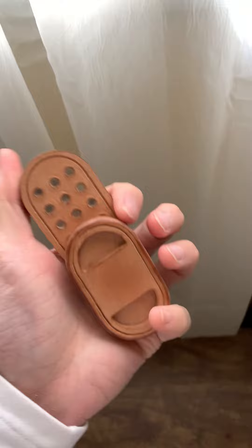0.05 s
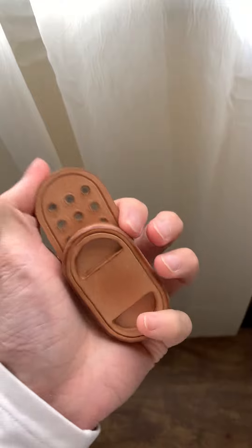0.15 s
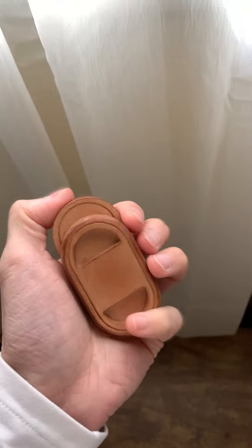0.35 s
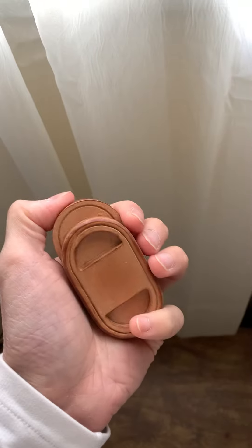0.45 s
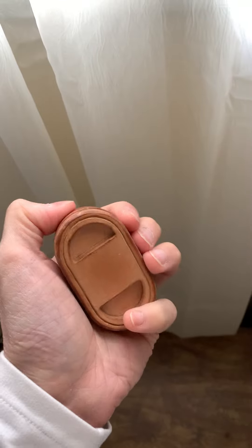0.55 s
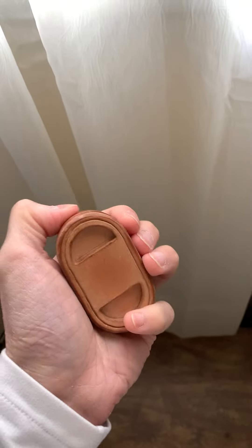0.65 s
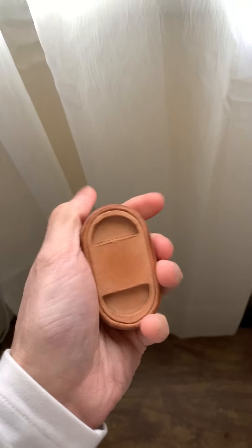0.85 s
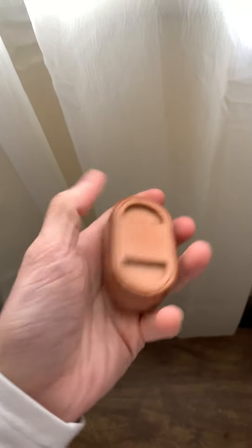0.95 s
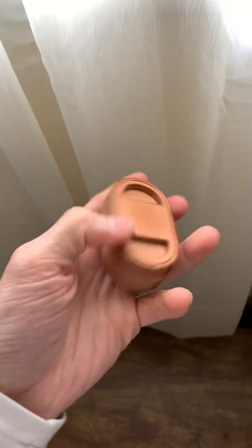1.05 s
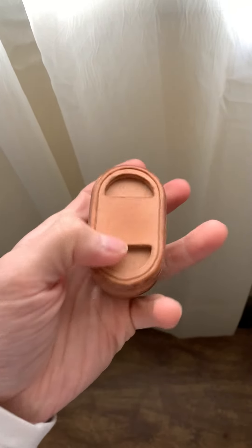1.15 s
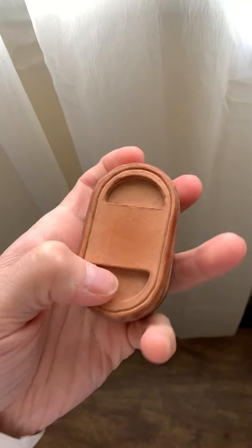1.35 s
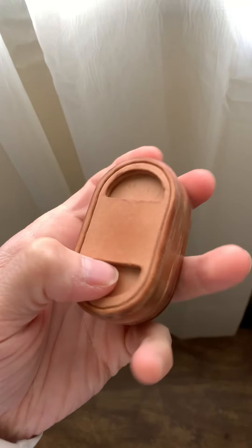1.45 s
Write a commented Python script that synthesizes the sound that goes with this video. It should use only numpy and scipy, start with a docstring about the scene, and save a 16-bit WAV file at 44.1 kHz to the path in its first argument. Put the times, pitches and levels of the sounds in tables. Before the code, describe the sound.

A leather-covered magnetic slider snaps shut in four quick clicks, then fingers rub it faintly.

```python
"""In a quiet room, close to the microphone, one hand shifts its grip on a leather-covered magnetic slider.
Pushed shut, it snaps into four magnet stops, the second with a double hit and the last two loudest.
A short swell of noise rises into each snap, a dull clack of the stiff core with a little room behind it.
Then the fingers turn the slider over, bumping softly and rubbing faintly on the leather."""
import sys
import numpy as np
from scipy import signal
from scipy.fft import rfft, irfft
from scipy.io import wavfile

SR = 44100
rng = np.random.default_rng(int(sys.argv[2]) if len(sys.argv) > 2 else 0)


def inscribe(sig):
    """Save sig as 16-bit PCM at rate SR to the path in sys.argv[1].

    A 1-D sig is mono; a 2-D sig holds one channel per row.
    Samples are clipped to [-1, 1] before scaling.
    """
    pcm = np.round(np.clip(np.atleast_2d(sig).T, -1, 1) * 32767)
    wavfile.write(sys.argv[1], SR, pcm.astype(np.int16))


N = 66150
TIME = np.arange(N) / SR
FREQS = np.maximum(np.fft.rfftfreq(N, 1 / SR), 1)

# stereo image of the noises: f/Hz, left-right correlation
NOISE_IMAGE = [(50, 0.932), (130, 0.73), (300, 0), (1000, 0), (4000, 0.55), (12000, 0.5)]
# colour of the room tone: f/Hz, level/dB
ROOM_TONE_EQ = [(20, -32), (40, -9), (56, 1), (85, -9.5), (122, -3), (170, -15.5), (240, -8.5),
                (350, -21.5), (800, -34.5), (1500, -32.5), (2500, -35.5), (6000, -38), (12000, -34.5),
                (13500, -40.5), (14500, -65.5)]
# colour of the reverb tail: f/Hz, level/dB
REVERB_EQ = [(150, -10.5), (400, 4.5), (900, 0.5), (1500, -3), (2200, 1.5), (3500, -1), (6000, 1),
             (12000, -4), (15000, -1.5)]
# decay of the reverb tail: f/Hz, t60/s
REVERB_DECAY = [(300, 0.18), (1000, .21), (2200, 0.21), (4000, 0.17), (12000, 0.16)]
# bounces off near surfaces: delay/s, left/dB, right/dB
REFLECTIONS = [(.0036, -22.5, -16), (.0095, -16.5, -28)]

# the hand shifts its hold: t/s, length/s, level/dB
GRIP_SHIFTS = [(0.163, 0.059, -62.5), (0.235, 0.031, -56.5), (0.268, .08, -68.5), (0.594, 0.064, -66.5),
               (1.02, 0.0865, -70), (1.447, 0.081, -69.5)]
# colour of the grip rumble: f/Hz, level/dB
GRIP_EQ = [(25, -11.5), (55, 1), (120, -1), (230, 0.5), (400, -15), (900, -50.5), (3000, -46)]
# fingertips pad against the slider: t/s, f/Hz before tuning, level/dB, t60/s
FINGER_BUMPS = [(0.232, 138, -50, 0.043), (1.036, 251.6, -54, 0.07), (1.078, 153.7, -53, 0.052),
                (1.171, 112.1, -58, 0.16), (1.25, 125, -67.5, 0.081)]
# fingers stroke the leather: t/s, length/s, fade/s, rub/dB, skin hiss/dB
FINGER_STROKES = [(0.087, 0.044, 0.021, -73.5, -85), (0.169, 0.071, 0.033, -68.5, -76),
                  (0.736, 0.13, 0.031, -65.5, -84), (0.882, 0.13, 0.021, -72.5, -76.5),
                  (1.025, 0.029, .015, -77, -68.5), (1.055, 0.035, 0.023, -70, -58),
                  (1.259, 0.043, 0.033, -76.5, -60), (1.341, 0.05, .035, -74.5, -57.5),
                  (1.409, 0.085, 0.031, -65.5, -63)]
# a fingertip lands with a small tick: t/s, level/dB, t60/s
FINGER_TICK = (1.0205, -56, .025)
# colour of the rub on leather: f/Hz, level/dB
RUB_EQ = [(300, -19.5), (800, -22), (1600, -5.5), (2300, -5.5), (3000, 4), (5200, 2.5), (8200, -3.5),
          (12000, -6), (13500, -9.5), (14500, -18)]
# colour of the skin hiss: f/Hz, level/dB
SKIN_EQ = [(2000, -36), (5000, -11.5), (6200, 8), (7100, 14.5), (8200, 3.5), (9500, -33.5), (12000, -9),
           (13500, -24), (14500, -56.5)]

# noise swells into each snap: t/s, length/s, hiss at the crest/dB, swell exponent, mids at the crest/dB
LEAD_IN_SWELLS = [(0.121, .034, -48, 1.37, -63.5), (0.211, 0.022, -38.5, 1.11, -49.5),
                  (.348, 0.018, -39.5, 1.3, -41.5), (0.528, .020, -35.5, 1.98, -30.5)]
# colour of a swell's bright hiss: f/Hz, level/dB
SWELL_HISS_EQ = [(600, -18), (1500, -11.5), (3000, -3), (5000, -1.5), (7500, 3.5), (12000, 0.5),
                 (14000, -12), (16500, -25)]
# colour of a swell's midrange noise: f/Hz, level/dB
SWELL_MIDS_EQ = [(200, -24), (600, -16.5), (1200, -7), (2000, 7), (3000, -11.5), (5000, -30),
                 (12000, -45.5)]

# hits on the magnet stops: t/s, core/dB, core pitch ratio, contact cut-off/Hz, knock/dB, crack/dB,
# crack tilt/(dB per octave), ringing band/Hz, band boost/dB
STOP_HITS = [(0.1547, -35.5, .72, 3500, -37, -41.5, -3, 2734, 13),
             (0.2293, -15.5, 1.05, 4000, -25, -19.5, -2, 5500, 3.5),
             (0.2319, -15, 0.99, 2000, -17.5, -44, -3, 886, 5),
             (0.3668, -4, 1.05, 6000, -14.5, -18.5, 1.5, 3900, 5.5),
             (0.5451, -3.5, 1.02, 5000, -20, -17, 2.5, 3100, 3.5)]
# modes of the stiff core under the leather: f/Hz before each hit's pitch ratio, level/dB, t60/s
CORE_RING = [(887, -19.5, 0.01), (1150, -13, 0.012), (1431.6, -8, .01), (1852.5, 0, 0.0053),
             (2048.5, -3, 0.0093), (2649, -11.5, 0.0097), (3450, -9.5, 0.0022), (4380, -12.5, 0.0043),
             (5020, -21, .003), (7015, -27, 0.0062), (8240, -30, 0.0078), (9800, -21.5, 0.009)]
# low modes of the slider in the palm: f/Hz before tuning, level/dB, t60/s
PALM_KNOCK = [(240, -35.5, 0.019), (405, -24, 0.038), (648, -19.5, .025)]
# colour of the crack before its tilt: f/Hz, level/dB
CRACK_EQ = [(2000, -2.5), (4000, 3.5), (5800, -3), (7500, -2), (11000, 3), (13000, -18.5), (16500, -15)]
# the slider's phase at the two microphone ports: f/Hz, left lead/rad
MIC_PHASE = [(400, 0), (1000, -.3), (1350, -.15), (2100, 1.3), (2700, 1.9), (3500, 1.6), (4500, 3.2),
             (7200, 6.3), (8500, 8.2), (10500, 9.9), (12500, 12.5), (16000, 15)]
# the slider's balance at the two ports: f/Hz, left minus right/dB
MIC_BALANCE = [(400, -3.5), (900, -4.5), (1300, -1), (2100, -2.2), (3300, 0), (4500, -5.5), (6200, 0),
               (7500, 1), (12000, 0)]


def from_db(db):
    """Decibels to gain."""
    return 10 ** (np.asarray(db) / 20)


def rms_one(x):
    """Scale to rms 1."""
    return x / np.sqrt(np.mean(x ** 2) + 1e-20)


def at_hz(points, hz):
    """Read a curve on a log-frequency axis."""
    f, v = np.transpose(points)
    return np.interp(np.log(hz), np.log(f), v)


def colour(eq, notch_hz=9620, width_hz=200, notch_db=-35.5):
    """Gain per frequency of an EQ curve, with a narrow notch in the treble."""
    return from_db(at_hz(eq, FREQS) + notch_db * np.exp(-((FREQS - notch_hz) / width_hz) ** 2))


def noise(eq):
    """Coloured stereo noise at rms 1: centred in the bass, widest in the mids."""
    mid, side = rfft(rng.standard_normal((2, N)))
    alike = at_hz(NOISE_IMAGE, FREQS)
    stereo = np.sqrt(1 + alike) * mid + np.sqrt(1 - alike) * side * [[1], [-1]]
    return rms_one(irfft(colour(eq) * stereo, N))


def grain(rough_db, rate_hz):
    """Gritty random flutter of a level."""
    flutter = irfft(rfft(rng.standard_normal(N)) / (1 + (FREQS / rate_hz) ** 2), N)
    return from_db(rough_db * rms_one(flutter))


def gate(start, length, fade):
    """Smooth attack, hold and release."""
    up = np.clip(np.minimum(TIME - start, start + length - TIME) / fade + .5, 0, 1)
    return np.sin(up * np.pi / 2) ** 2


def decay(t, t60):
    """An envelope falling 60 dB per t60."""
    return from_db(-60 * np.clip(t / t60, 0, 5))


def roll_off(x, hz, kind="low"):
    """Gentle low-pass or high-pass."""
    return signal.sosfilt(signal.butter(2, hz, kind, fs=SR, output="sos"), x + 1e-18)


def delayed(x, s):
    """The same sound a little later."""
    return irfft(rfft(x) * np.exp(-2j * np.pi * FREQS * s), N)


def ring(modes, start, tuning):
    """Damped sines of alternating sign from one blow."""
    t = np.maximum(TIME - start, 0)
    return sum((-1) ** k * from_db(db) * decay(t, t60) * np.sin(2 * np.pi * hz * tuning * t)
               for k, (hz, db, t60) in enumerate(modes))


def room_tone(level_db=-67.5):
    """The quiet room: a steady, bass-heavy bed."""
    return from_db(level_db) * noise(ROOM_TONE_EQ)


def reverb(x, wet_db, onset_s=.0013):
    """The room's short diffuse tail, different at each side, dying band by band."""
    spectrum = rfft(rng.standard_normal((2, N))) * colour(REVERB_EQ)
    centres = np.geomspace(200, 12800, 7)
    tail = 0
    for hz, pick in zip(centres, np.eye(len(centres))):
        band = irfft(spectrum * np.interp(np.log(FREQS), np.log(centres), pick), N)
        tail = tail + band * decay(TIME, at_hz(REVERB_DECAY, hz))
    tail = rms_one(tail * np.minimum(TIME / onset_s, 1) ** 2) / np.sqrt(N)
    return from_db(wet_db) * signal.fftconvolve(x[None], tail, axes=1)[:, :N]


def early_reflections(x):
    """Near surfaces throw back two darker copies."""
    dull = roll_off(x, hz=4000)
    return sum(from_db([[left], [right]]) * delayed(dull, s) for s, left, right in REFLECTIONS)


def grip_rumble():
    """Low rumble while the hand shifts its hold."""
    return noise(GRIP_EQ) * sum(gate(s, length, fade=.01) * from_db(db) for s, length, db in GRIP_SHIFTS)


def finger_bumps(attack_s=.0025):
    """Fingertips pad against the slider with soft low thumps."""
    return sum(np.clip((TIME - s) / attack_s, 0, 1) * ring([(hz, db, t60)], s, tuning=.99)
               for s, hz, db, t60 in FINGER_BUMPS)


def finger_rubs():
    """Skin rubs, hisses and ticks on the leather, with some room around it."""
    rub, hiss = noise(RUB_EQ)[0], noise(SKIN_EQ)[0]
    strokes = sum(gate(s, length, fade) * (from_db(rub_db) * rub + from_db(hiss_db) * hiss)
                  for s, length, fade, rub_db, hiss_db in FINGER_STROKES)
    tick_s, tick_db, tick_t60 = FINGER_TICK
    tick = from_db(tick_db) * rub * (TIME > tick_s) * decay(TIME - tick_s, tick_t60)
    friction = strokes * grain(rough_db=3.5, rate_hz=64) + tick
    return np.array([friction, delayed(friction, s=.0001)]) + reverb(friction, wet_db=-8)


def lead_in_swells():
    """A short swell of bright hiss and midrange noise rises into each snap."""
    hiss, mids = noise(SWELL_HISS_EQ)[0], noise(SWELL_MIDS_EQ)[0]
    out = np.zeros(N)
    for s, length, hiss_db, exponent, mids_db in LEAD_IN_SWELLS:
        swell = gate(s, length, fade=.00068) * np.clip((TIME - s) / length, 0, 1) ** exponent
        out += swell * (from_db(hiss_db) * hiss + from_db(mids_db) * mids)
    return out * grain(rough_db=2.5, rate_hz=170)


def close_mic(x):
    """Each frequency reaches the two microphone ports with its own lag and balance."""
    tilt = from_db(at_hz(MIC_BALANCE, FREQS) / 2)
    right_lag = np.exp(-1j * at_hz(MIC_PHASE, FREQS))
    return irfft(rfft(x) * np.array([tilt, right_lag / tilt]), N)


def stop_resonance(x, hz, db):
    """Boost one band: each stop leaves a different part of the slider free to ring."""
    b, a = signal.iirpeak(hz, Q=1.9, fs=SR)
    return x + (from_db(db) - 1) * signal.lfilter(b, a, x + 1e-18)


def magnet_snaps(crack_delay_s=.0009, crack_attack_s=.00027, crack_t60_s=.0045):
    """Each hit rings the core, knocks in the palm and gives a brief bright crack."""
    out = np.zeros(N)
    white = rfft(rng.standard_normal(N))
    octaves = np.log2(np.maximum(FREQS, CRACK_EQ[0][0]))
    for s, core_db, pitch, contact_hz, knock_db, crack_db, tilt, band_hz, boost_db in STOP_HITS:
        t = np.maximum(TIME - s - crack_delay_s, 0)
        bright = rms_one(irfft(white * from_db(at_hz(CRACK_EQ, FREQS) + tilt * octaves), N))
        crack = from_db(crack_db) * bright * np.minimum(t / crack_attack_s, 1) * decay(t, crack_t60_s)
        core = from_db(core_db) * roll_off(ring(CORE_RING, s, pitch), contact_hz)
        knock = from_db(knock_db) * ring(PALM_KNOCK, s, tuning=.96)
        out += stop_resonance(core + crack, band_hz, boost_db) + knock
    return roll_off(out, hz=260, kind="high")


def scene():
    """The slider up front, with its reflections and reverb, over hand sounds and room tone."""
    slider = magnet_snaps() + lead_in_swells()
    space = early_reflections(slider) + reverb(slider, wet_db=-13.5)
    hand = finger_rubs() + grip_rumble() + finger_bumps()
    return close_mic(slider) + space + hand + room_tone()


def record(dry, stopband_hz=17000):
    """A steep high cut takes off the very top."""
    return signal.sosfilt(signal.cheby2(14, 60, stopband_hz, fs=SR, output="sos"), dry)


dry = scene()
out = record(dry)
inscribe(out)
```